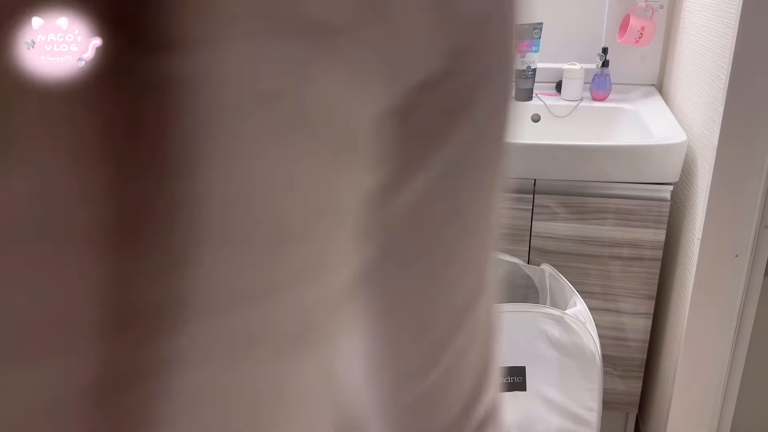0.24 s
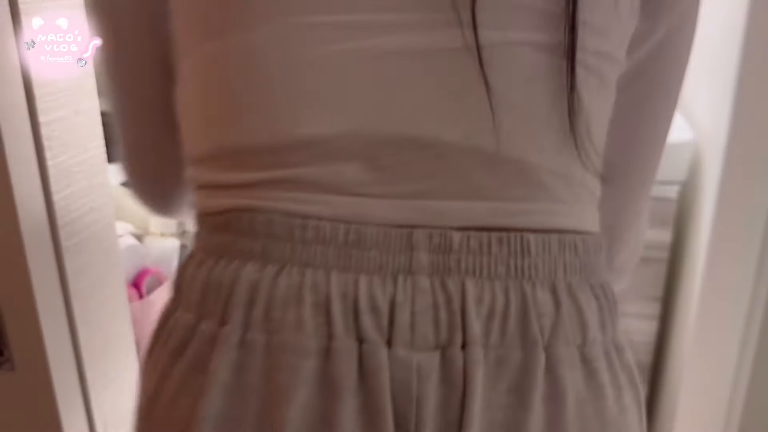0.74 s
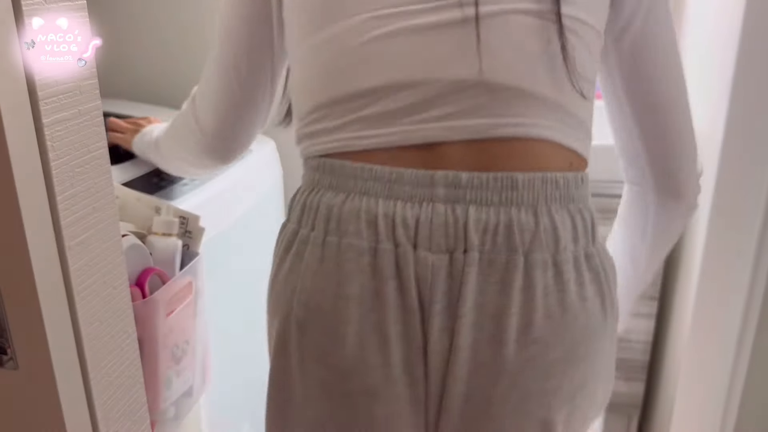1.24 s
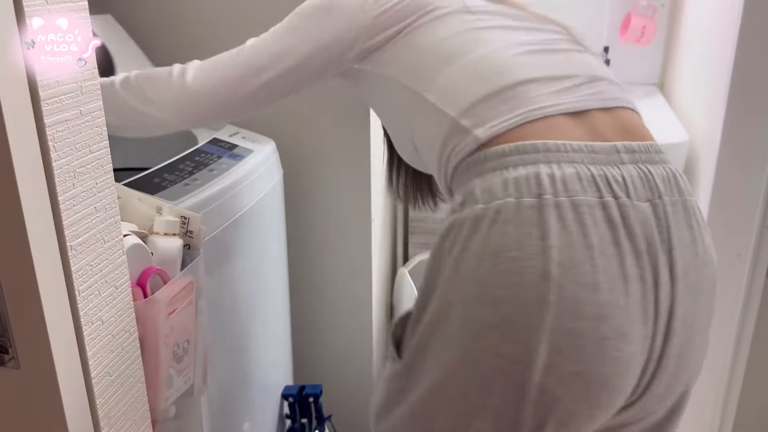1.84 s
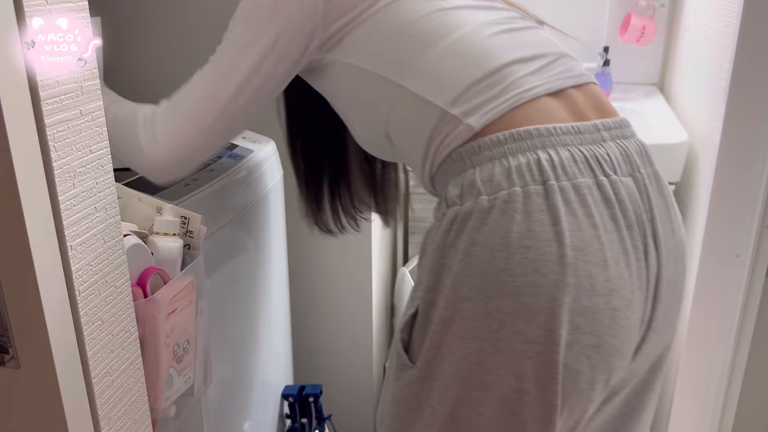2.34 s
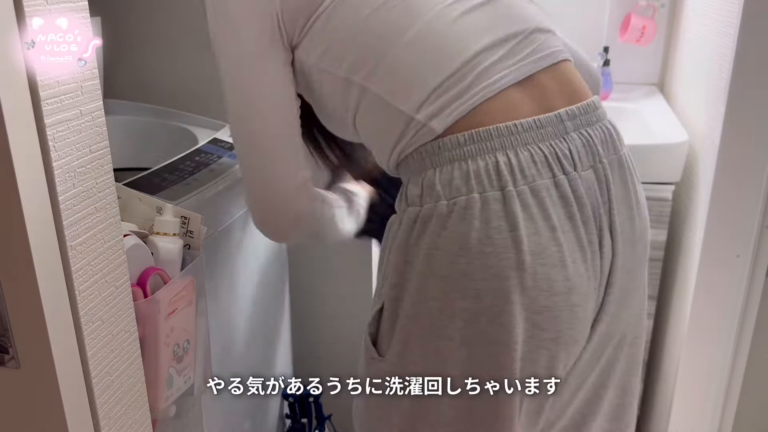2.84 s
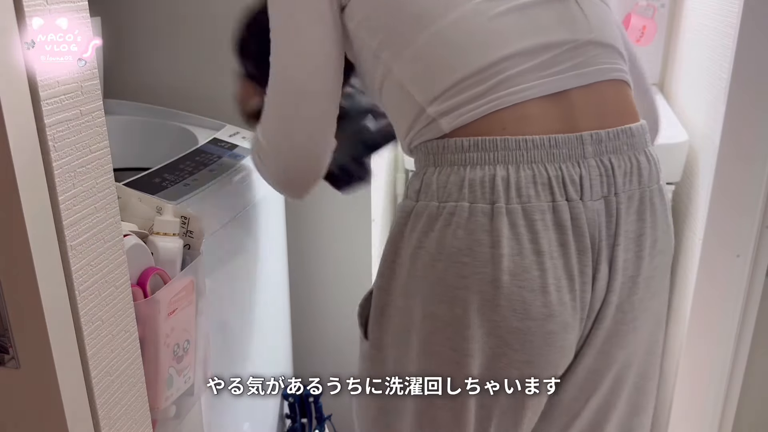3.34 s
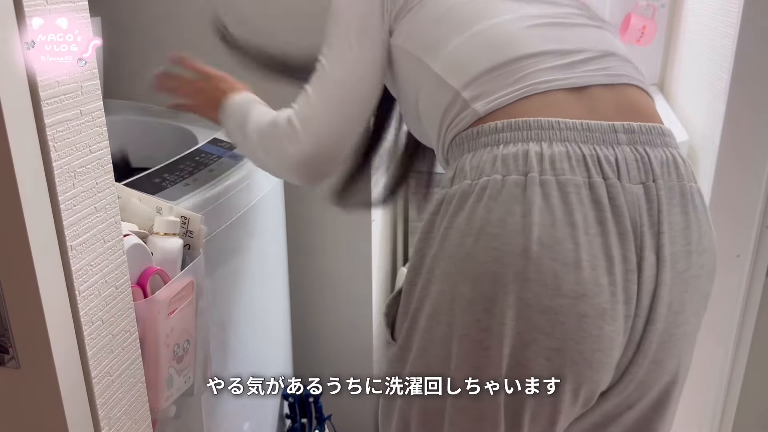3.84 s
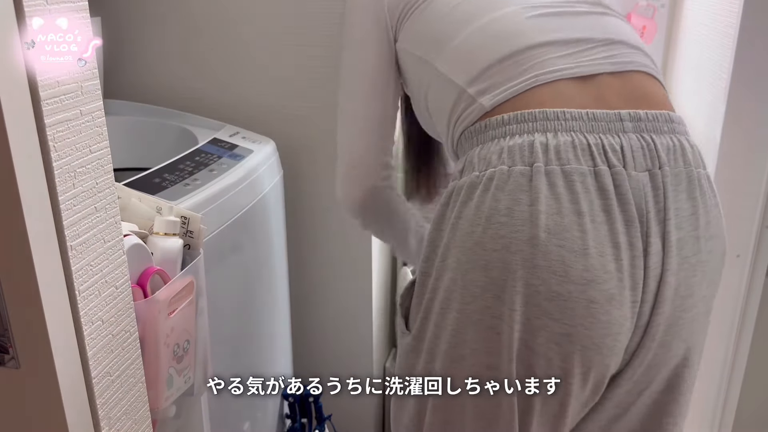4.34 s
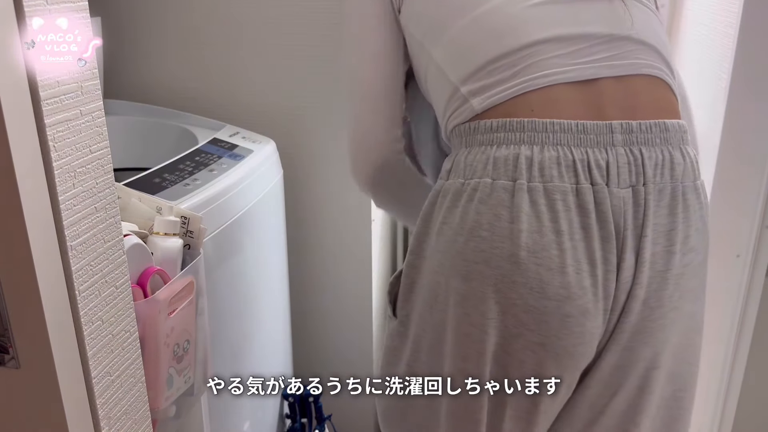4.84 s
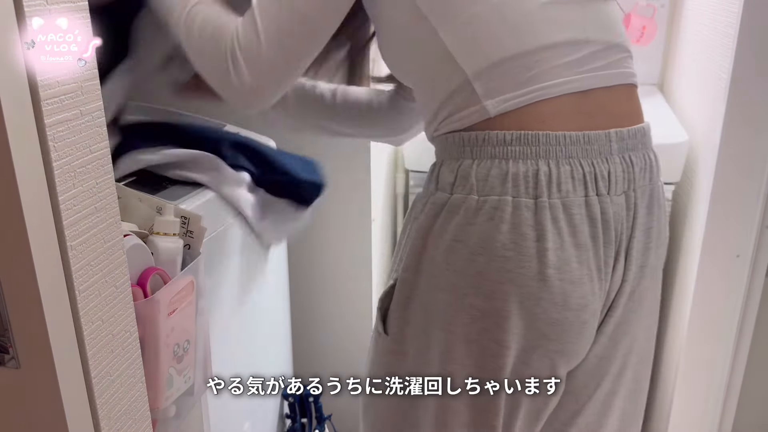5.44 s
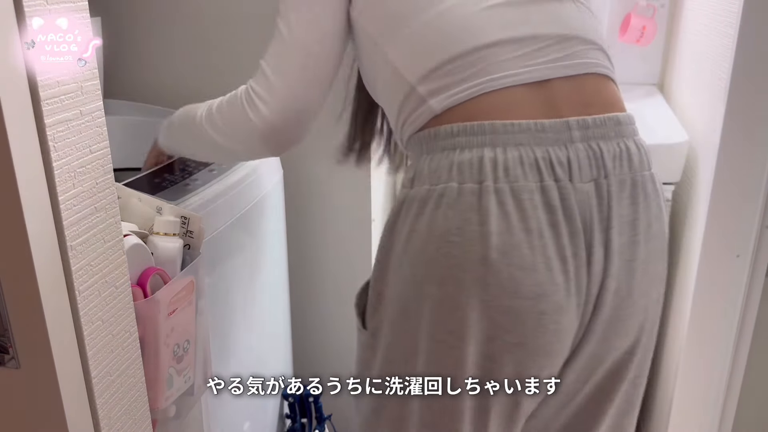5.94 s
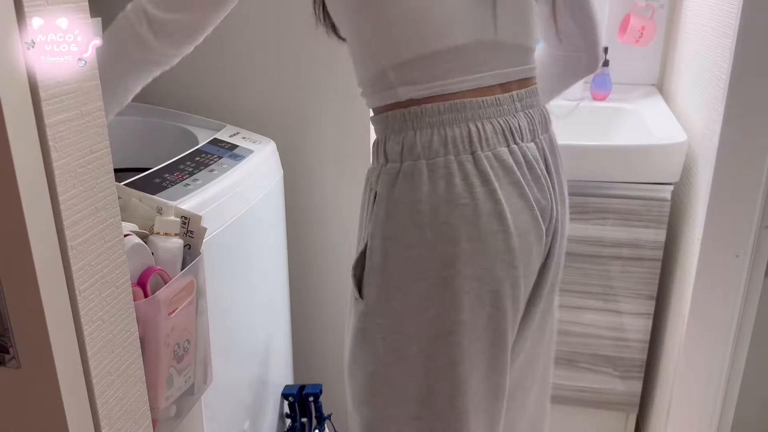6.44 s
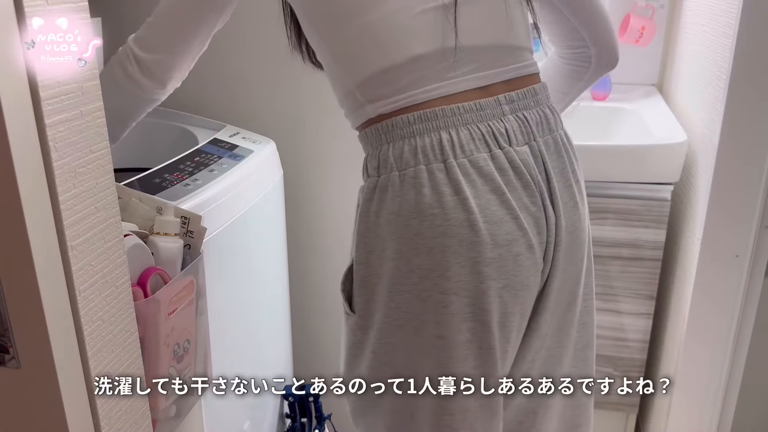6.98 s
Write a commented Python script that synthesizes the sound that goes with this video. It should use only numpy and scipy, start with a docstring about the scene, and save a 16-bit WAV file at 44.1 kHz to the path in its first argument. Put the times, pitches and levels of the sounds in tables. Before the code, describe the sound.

Close in a small, quiet washroom, a hand knocks a top-loading washer and its plastic lid clacks open. Clothes rustle and drop into the tub with soft thuds and hollow rim knocks, one sharp double click of fasteners standing out. After a lull, the motor cuts in abruptly, hums and buzzes for half a second with light rattles, then coasts to rest.

```python
"""In a small washroom, laundry goes into a top-loading washing machine: the plastic lid clacks open,
clothes swish and drop into the tub, and their fasteners click against the rim. Then the motor is heard
abruptly, humming for half a second as it turns the load with light rattles, and coasts to rest. Contacts
are shaped noise bursts with a resonance and echoes, fabric is modulated noise, and the motor is
wavering tones plus noise."""
import sys
import numpy as np
from scipy import signal
from scipy.fft import rfft, irfft, next_fast_len
from scipy.io import wavfile
from scipy.ndimage import uniform_filter1d, map_coordinates

SR = 44100
rng = np.random.default_rng(int(sys.argv[2]) if len(sys.argv) > 2 else 0)


def transcribe(signal):
    """Save signal, clipped to [-1, 1], as a 16-bit WAV file at the path in sys.argv[1]."""
    frames = np.atleast_2d(signal).T
    limited = np.clip(frames, -1, 1)
    pcm = np.round(limited * 32767).astype(np.int16)
    wavfile.write(sys.argv[1], SR, pcm)


N = 317961  # length in samples

# Room tone. Each row: frequency in Hz, relative spectral level in dB per Hz.
STILL_SPECTRUM = [(20, -17), (45, -7), (95, 3), (140, -8), (300, -20), (800, -25.5), (2000, -33.5),
                  (5000, -42), (10500, -34.5), (15000, -42.5)]
# Likeness of the two sides. Each row: frequency in Hz, left-right correlation from 0 to 1.
STEREO_LIKENESS = [(70, 0.99), (130, 1), (300, 0.88), (700, 0.21), (1800, 0.27), (5000, .58), (8000, 0.84),
                   (12000, 0.94)]
# Balance of the sides. Each row: frequency in Hz, left minus right in dB.
SIDE_BALANCE = [(100, 0.5), (300, -3), (600, 1.5), (1000, 0), (2000, 1.5), (5000, 2.2), (12000, -1)]
# Reverberation of the washroom. Each row: frequency in Hz, time to fall by 60 dB in seconds.
ROOM_DECAY = [(100, .4), (400, 0.41), (1000, 0.26), (2000, 0.24), (6000, 0.19), (14000, 0.11)]
ABSORB_HZ = 11000  # clothes and walls soak up the treble of the echoes above this
TOP_HZ = 15500  # upper band limit

# Bass noise of the tub. Each row: frequency in Hz, relative spectral level in dB per Hz.
RUMBLE_SPECTRUM = [(20, -37), (35, -21.5), (50, -2.5), (95, 2), (125, -11), (170, -6), (300, -17),
                   (600, -22), (1500, -62.5)]
# Fabric rubbing. Each row: frequency in Hz, relative spectral level in dB per Hz.
RUB_SPECTRUM = [(100, -36), (250, -1), (550, -2), (900, -1), (1700, -1.5), (3500, -13), (8000, -20.5)]
# Fabric swishing. Each row: frequency in Hz, relative spectral level in dB per Hz.
SWISH_SPECTRUM = [(1000, -21.5), (3000, -2), (6500, -2), (8300, -0.5), (11000, -3.5), (14500, -3.5),
                  (16000, -14)]
# Fabric sliding over fabric. Each row: time of the peak in seconds, length in seconds,
# relative swish level in dB, level of the rub over the swish in dB.
FABRIC_STROKES = [(0.197, 0.39, -70, -4), (0.923, 0.73, -75, 0), (1.08, 0.22, -71, 5),
                  (1.478, 0.094, -54, 7), (2.228, 0.29, -57.5, -4.5), (2.555, 0.39, -62, -4.5),
                  (2.877, 0.095, -68.5, 2.5), (4.152, 0.42, -61.5, -7.5), (4.43, .27, -53, -4.5),
                  (4.727, 0.36, -56.5, -2.5), (5.148, 0.14, -62, 5.5), (5.213, 0.077, -58, -3.5),
                  (5.532, .22, -56, -13), (5.763, 0.14, -75.5, 8.5), (7.12, 0.25, -64.5, -3.5)]
# The tub is leant on or its load shifted. Each row: time of the peak in seconds, length in seconds,
# relative rumble level in dB.
TUB_SHOVES = [(1.11, 0.14, -55), (1.48, 0.35, -47.5), (1.77, 0.15, -47.5), (2.29, 0.25, -45.5),
              (2.66, 0.19, -51), (2.92, 0.23, -56.5), (3.2, 0.64, -66), (3.47, 0.049, -61),
              (3.73, 0.18, -55.5), (3.94, 0.46, -47), (4.56, 0.44, -54), (4.87, 0.24, -53),
              (5.24, 0.19, -50.5), (5.5, 0.27, -45), (5.76, 0.28, -49.5), (5.99, 0.083, -56)]
# A movement: share of its length spent swelling, exponent shaping its top, drop in dB at its two ends.
RISE_SHARE, ROUNDNESS, EDGE_DB = 0.41, 1.6, 9

# Soft blows on the cabinet. Each row: start in seconds, relative level in dB, pitch of the push in Hz.
CABINET_BLOWS = [(0.252, -43.5, 49), (1.039, -46.5, 50), (1.328, -40.5, 75), (1.463, -37, 89),
                 (1.536, -37, 79), (2.172, -37.5, 101), (2.182, -38.5, 170), (2.277, -34, 77),
                 (3.417, -50.5, 100), (3.881, -35.5, 82.4), (3.929, -35, 265), (4.046, -36, 285),
                 (5.467, -43.5, 108), (5.692, -39.5, 83), (6.389, -32.5, 100)]
# Resonances of the cabinet's panels. Each row: frequency in Hz, width in Hz, gain in dB.
PANEL_MODES = [(51.8, 3.6, -3.5), (80.8, 9.7, 0), (101.3, 8.8, 0), (154, 9.6, 1.5), (226.6, 11, 4),
               (330, 36, -4)]
# Duller knocks of hands and clothes on the rim. Each row: start in seconds, relative level in dB,
# brightness in dB per octave, ring in Hz.
RIM_KNOCKS = [(.217, -52, 4, 1620), (1.022, -48.5, 4, 1300), (1.444, -35.5, 1.3, 645),
              (1.49, -38.5, 0.5, 2130), (1.665, -46, -2.5, 830), (1.761, -47.5, 6, 790),
              (1.984, -56, 5.5, 1990), (2.552, -45, 2.5, 2000), (2.623, -48, 0.5, 654),
              (2.857, -52.5, -2.5, 980), (3.334, -60.5, -8, 314), (3.446, -59, -10, 600),
              (3.704, -48.5, -5.5, 650), (3.925, -32.5, -10.5, 504), (4.472, -39.5, 0, 1950),
              (4.649, -51.5, 3, 1080), (4.809, -42.5, -1, 630), (5.011, -43, -3.5, 710),
              (5.283, -41, 1, 810), (5.423, -32, 1.6, 1310), (5.781, -44.5, 3.3, 1810),
              (5.898, -40.5, 0.9, 3070)]
# Hard clicks of catches and fasteners. Each row: start in seconds, relative level in dB,
# brightness in dB per octave, ring in Hz.
FASTENER_CLICKS = [(.129, -42.5, -1, 3330), (1.085, -29, -1, 4430), (1.103, -34, 1.5, 1490),
                   (1.399, -31.5, 0.5, 1630), (1.802, -44.5, 0, 2920), (2.194, -27.5, -3, 960),
                   (2.293, -36, 2.5, 7100), (2.391, -40.5, 5, 7100), (3.73, -42.5, 10.5, 650),
                   (4.027, -24, -0.7, 1100), (5.466, -12.5, 0.7, 4960), (5.553, -19.5, 1.3, 5170)]
# The lid unlatches, folds back and bounces. Each row: start in seconds, relative level in dB,
# brightness in dB per octave, ring in Hz, ring gain in dB, time for the chatter to fall by 60 dB in seconds.
LID_BLOWS = [(1.309, -26, 6, 1500, 13, 0.14), (2.156, -20.5, 1.3, 820, 5, 0.037),
             (2.253, -30.5, -0.8, 865, 7.5, 0.061), (2.33, -36.5, 0, 840, 13, 0.019)]
# Rattles of the load. Each row: start in seconds, relative level in dB.
LOAD_RATTLES = [(6.443, -54.5), (6.522, -43.5), (6.599, -52.5), (6.674, -44.5), (6.712, -42), (6.755, -40),
                (6.8, -39.5), (6.835, -39.5), (6.909, -42.5), (6.987, -45)]
# Colour of hard contacts. Each row: frequency in Hz, gain in dB.
HARD_COLOUR = [(60, -9.5), (200, -7), (750, -3.5), (1200, 1), (2500, -5.5), (3700, -5), (6500, -1),
               (9000, -0.5), (15000, -11.5)]
# Colour of soft contacts. Each row: frequency in Hz, gain in dB.
SOFT_COLOUR = [(60, 4.5), (200, 0.5), (750, 0.5), (1200, -2.5), (2500, -8), (3700, -16), (6500, -19.5),
               (9000, -25), (15000, -38)]
# Colour of loose rattling things. Each row: frequency in Hz, gain in dB.
LOOSE_COLOUR = [(60, -17), (200, -12), (750, 7.5), (1200, 0.5), (2500, 1), (3700, 0), (6500, 0.5),
                (9000, -0.5), (15000, -17.5)]
RING_OCTAVES = .33  # width of a struck part's resonance

# Magnetic hum. Each row: mean frequency in Hz, relative level in dB.
HUM_TONES = [(100, -40.5), (200, -43.5), (300, -68.5), (400, -55), (600, -48.5)]
# Tones of the running drive. Each row: mean frequency in Hz, relative level in dB.
WHIR_TONES = [(92, -43), (221, -43.5), (312, -52), (485, -59.5), (520, -73)]
# Gear noise. Each row: frequency in Hz, relative spectral level in dB per Hz.
GEAR_SPECTRUM = [(50, -27), (90, -4), (135, -23.5), (180, 1), (222, 4.5), (265, -4), (330, 0), (420, -15),
                 (520, -4), (660, -36), (1100, -27), (2500, -36.5), (6000, -53)]
# Housing buzzing under load. Each row: mean frequency in Hz, relative level in dB.
BUZZ_TONES = [(700, -82), (738, -55.5), (800, -48.5), (900, -60), (937, -77)]
# Noise of the buzz. Each row: frequency in Hz, relative spectral level in dB per Hz.
RASP_SPECTRUM = [(500, -20), (680, -2), (780, 4.5), (860, -4.5), (970, -3), (1100, -34), (1600, -28),
                 (4000, -48)]
# The drive slips as it slows. Each row: start in seconds, nominal starting pitch in Hz, relative level in dB.
DRIVE_SQUEAKS = [(6.936, 788, -57), (6.98, 1192, -51)]
HEARD_FROM_S, FADES_FROM_S = 6.389, 6.888  # the motor is heard from the first, fades after the second
# Exponential time constants in seconds:
HUM_FADE_S, COAST_S = .05, 0.084  # the hum dies quickly, the rotor coasts on
BUZZ_RISE_S, BUZZ_FALL_S = 0.0405, 0.038  # the housing buzzes only under load
TUB_RISE_S, TUB_COAST_S = 0.35, 0.12  # the heavy tub follows slowly


def amp(db):
    """Level in decibels is twenty times the logarithm of the gain, inverted here."""
    return 10 ** (np.asarray(db) / 20)


def unit(x):
    """Normalisation to a root-mean-square of 1."""
    return x / np.sqrt(np.mean(x ** 2) + 1e-20)


def along(points, hz):
    """Interpolation of (Hz, value) points over logarithmic frequency."""
    f, v = np.transpose(points)
    return np.interp(np.log(hz + 1), np.log(f), v)


def wobble(rate):
    """Slow random modulation: a smooth curve through rate random knots a second."""
    knots = rng.standard_normal(int(N * rate / SR) + 4)
    return map_coordinates(knots, [np.arange(N) * rate / SR])


def filtered(x, response):
    """Linear filtering: the spectrum is multiplied by a response of frequency."""
    n = x.shape[-1]
    padded = next_fast_len(n + SR // 4, real=True)
    hz = np.fft.rfftfreq(padded, 1 / SR)
    return irfft(rfft(x, padded) * response(hz), padded)[..., :n]


def causal(gain):
    """Minimum phase by the folded cepstrum: nothing sounds before the blow."""
    cepstrum = irfft(np.log(gain + 1e-6))
    half = len(cepstrum) // 2
    folded = np.r_[cepstrum[0], 2 * cepstrum[1:half], np.zeros(half)]
    return np.exp(rfft(folded))


def add(track, s, sound):
    """Superposition: a sound is summed into the track from time s in seconds."""
    part = track[:, max(round(s * SR), 0):][:, :sound.shape[-1]]
    part += sound[..., :part.shape[-1]]


def diffuse(size):
    """Diffuse field: white stereo noise whose left-right correlation depends on frequency."""
    def mid_side(hz):
        turn = np.arccos(np.clip(along(STEREO_LIKENESS, hz), -1, 1)) / 2
        return np.array([np.cos(turn), np.sin(turn)])

    mid, side = filtered(rng.standard_normal((2, size)), mid_side)
    return np.array([mid + side, mid - side])


def noise(spectrum, patchy_db=0):
    """Coloured stereo noise of rms 1, with patches that swell and fade at their own pitches."""
    z = signal.stft(diffuse(N), nperseg=512)[2]
    field = rng.standard_normal(z.shape[1:])
    field = uniform_filter1d(field, size=7, axis=0)
    field = uniform_filter1d(field, size=6, axis=1)
    patchy = signal.istft(z * amp(patchy_db * unit(field)), nperseg=512)[1][:, :N]
    return unit(filtered(patchy, lambda hz: amp(along(spectrum, hz))))


def room(wet_db, early_db, early_t60=0.027):
    """Reverberation: direct sound, then duller echoes off the close walls and a short decaying tail."""
    hz, t, z = signal.stft(diffuse(SR // 3), SR, nperseg=256)
    decay = amp(-60 * t / along(ROOM_DECAY, hz)[:, None])
    tail = signal.istft(z * decay, SR, nperseg=256)[1]
    size = tail.shape[1]
    early = diffuse(size) * amp(-60 * np.arange(size) / SR / early_t60)
    answer = amp(wet_db) * tail / np.linalg.norm(tail[0])
    answer += amp(early_db) * early / np.linalg.norm(early[0])
    keep = np.exp(-2 * np.pi * ABSORB_HZ / SR)
    answer = signal.lfilter([1 - keep], [1, -keep], answer)
    answer[:, 0] += 1  # direct sound
    answer[1] = np.r_[0, answer[1, :-1]]  # the machine stands a little to the left
    return answer


def still_air():
    """Stationary noise: the steady room tone under everything."""
    return amp(-67.5) * noise(STILL_SPECTRUM)


def swells(rows):
    """Power addition of overlapping movements (s, length, dB), each swelling to its peak and fading."""
    t, power = np.arange(N) / SR, np.zeros(N)
    for s, length, db in rows:
        away = np.maximum((s - t) / RISE_SHARE, (t - s) / (1 - RISE_SHARE)) / length
        near = away < 10
        power[near] += amp(db - EDGE_DB * away[near] ** ROUNDNESS) ** 2
    return np.sqrt(power)


def cloth(rumble_db=-1, rub_db=0, swish_db=1, drag_db=-20, grain_db=-3.0, fold_db=2.9, catch_db=-3):
    """Friction noise: fabric slides in folds, its threads catching finely; the load bumps and drags."""
    rumble = swells(TUB_SHOVES)
    swish = swells([(s, length, db) for s, length, db, _ in FABRIC_STROKES])
    stroke_rub = swells([(s, length, db + over) for s, length, db, over in FABRIC_STROKES])
    rub = np.hypot(stroke_rub, amp(drag_db) * rumble)
    folds = fold_db * wobble(36)
    threads = grain_db * wobble(500)
    catches = (rng.random(N) < 130 / SR) * rng.uniform(-1, 1, N)  # about 130 a second
    crackle = signal.fftconvolve(catches[None], room(-0.5, 0, early_t60=0.022), axes=1)[:, :N]
    # the rub's colour, moved up by a factor of 1.4 in frequency
    crackle = unit(filtered(crackle, lambda hz: causal(amp(along(RUB_SPECTRUM, hz / 1.4)))))
    friction = amp(threads) * noise(RUB_SPECTRUM, patchy_db=2) + amp(catch_db) * crackle
    rubbing = rub * amp(rub_db + folds) * friction
    swishing = swish * amp(swish_db + folds / 2) * noise(SWISH_SPECTRUM, patchy_db=1.1)
    return rubbing + swishing + rumble * amp(rumble_db) * noise(RUMBLE_SPECTRUM)


def thuds(gain_db=-5, cycles=1.0, direct_db=-17):
    """Forced resonance: a soft push is heard itself and sets the cabinet's panels booming."""
    out, t = np.zeros((2, N)), np.arange(SR // 2) / SR

    def panels(f):
        response = amp(direct_db)
        for centre, width, db in PANEL_MODES:
            damping = 1j * f * width
            response = response + amp(db) * damping / (centre * centre - f * f + damping)
        return response

    for s, db, push_hz in CABINET_BLOWS:
        push = np.sin(2 * np.pi * push_hz * t) * np.exp(-push_hz * t / cycles)
        boom = filtered(push, panels)
        attack = np.sqrt(np.mean(boom[:SR // 20] ** 2))
        add(out, s, amp(db + gain_db) * boom / attack)
    return out


def plastic(rows, colour, gain_db, wet_db, early_db, ring_t60, linger_db, chatter_db, rise, crack_db):
    """Impact excitation: each contact is a brief, spiky chatter, and the struck part rings on a little."""
    out, t = np.zeros((2, N)), np.arange(SR // 4) / SR
    for s, db, brightness, ring_hz, ring_db, t60 in rows:
        def near_ring(hz):
            return np.exp(-(np.log2((hz + 1) / ring_hz) / RING_OCTAVES) ** 2)

        def contact_colour(hz):
            tilt = brightness * np.log2(np.maximum(hz / 600, 1))  # above 600 Hz only
            return causal(amp(along(colour, hz) + tilt + ring_db * near_ring(hz)))

        spikes = chatter_db * rng.standard_normal(len(t))
        chatter = rng.standard_normal(len(t)) * amp(spikes - 60 * t / t60)
        ring = filtered(rng.standard_normal(len(t)), near_ring) * amp(linger_db - 60 * t / ring_t60)
        blow = (chatter / np.linalg.norm(chatter) + ring) * (1 - np.exp(-t / rise))
        blow[:3] += amp(crack_db) * np.array([.5, -1, .5])  # first touch, the brightest instant
        heard = signal.fftconvolve(blow[None], room(wet_db, early_db), axes=1)[:, :SR // 3]
        heard = filtered(heard, contact_colour)
        attack = np.sqrt(np.mean(heard[:, :SR // 50] ** 2))  # rms of the first 20 ms
        add(out, s, amp(db + gain_db) * heard / attack)
    return out


def knocks(ring_db=4.0, t60=0.057):
    """Soft impact: padded blows bring out the rim's hollow notes."""
    rows = [(*knock, ring_db, t60) for knock in RIM_KNOCKS]
    return plastic(rows, SOFT_COLOUR, gain_db=-9.5, wet_db=3.0, early_db=2.5, ring_t60=.16,
                   linger_db=-38.5, chatter_db=8.5, rise=.0014, crack_db=-4)


def clicks(ring_db=4, t60=0.029):
    """Hard impact: small hard parts strike the plastic in short bursts."""
    rows = [(*click, ring_db, t60) for click in FASTENER_CLICKS]
    return plastic(rows, HARD_COLOUR, gain_db=-11.5, wet_db=1.5, early_db=-1, ring_t60=0.13,
                   linger_db=-32.5, chatter_db=4, rise=0.00092, crack_db=-5)


def lid():
    """Panel resonance: the lid's panels clack and ring."""
    return plastic(LID_BLOWS, SOFT_COLOUR, gain_db=-10.0, wet_db=5.0, early_db=6.5, ring_t60=0.13,
                   linger_db=-42, chatter_db=2.0, rise=0.0005, crack_db=-12)


def rattles(ring_hz=2300, ring_db=5, t60=0.076):
    """Repeated impact: loose things chatter in the turning tub."""
    rows = [(s, db, 0, ring_hz, ring_db, t60) for s, db in LOAD_RATTLES]
    return plastic(rows, LOOSE_COLOUR, gain_db=-9.5, wet_db=6.5, early_db=6.5, ring_t60=.068,
                   linger_db=-56, chatter_db=5, rise=0.00035, crack_db=-0.5)


def squeak(rise_hz=330, length=.028, rough=.06):
    """Frictional slip: each slip of the slowing drive is a short, rising, rough harmonic squeak."""
    out, t = np.zeros((2, N)), np.arange(SR // 4) / SR
    for s, start_hz, db in DRIVE_SQUEAKS:
        glide = start_hz + rise_hz * (1 - np.exp(-t / length))
        pitch = glide * (1 + rough * wobble(845)[:len(t)])
        phase = 2 * np.pi * np.cumsum(pitch) / SR
        chirp = sum(np.sin(k * phase) / k for k in (1, 2, 3))
        chirp *= np.exp(-(t / length) ** 2) * (1 - np.exp(-t / 0.00058))
        add(out, s, amp(db) * signal.fftconvolve(chirp[None], room(-0.5, -0.5), axes=1))
    return out


def dry_tick(db=-33, fall=0.0013):
    """Transient: a one-sided pulse decays exponentially, a dry tick where the motor is first heard."""
    out, t = np.zeros((2, N)), np.arange(SR // 100) / SR
    add(out, HEARD_FROM_S, -amp(db) * np.exp(-t / fall))
    return out


def rise_and_fade(rise_s, fall_s):
    """Exponential envelope, 0 to 1: rises from HEARD_FROM_S and decays after FADES_FROM_S."""
    t = np.arange(N) / SR
    rise = 1 - np.exp(-np.maximum(t - HEARD_FROM_S, 0) / rise_s)
    return rise * np.exp(-np.maximum(t - FADES_FROM_S, 0) / fall_s)


def tones(lines, waver_db, drift_hz):
    """Standing waves of the room bring each wavering tone to the two sides at different phases."""
    out, t = np.zeros((2, N)), np.arange(N) / SR
    for hz, db in lines:
        apart = np.arccos(np.clip(along(STEREO_LIKENESS, hz), -1, 1)) / 2
        drift = drift_hz * np.cumsum(wobble(20)) / SR
        phase = rng.uniform(0, 2 * np.pi) + 2 * np.pi * (hz * t + drift)
        out += amp(db + waver_db * wobble(6.1)) * np.sin(phase + apart * np.array([[1], [-1]]))
    return np.sqrt(2) * out


def motor(hum_db=-1, whir_db=0, growl_db=-43, buzz_db=-3, rasp_db=-49, lumps_db=2, tub_db=-43,
          abrupt_s=0.0014, strain_db=1.5):
    """Magnetic force hums at multiples of twice the mains rate; rotor and gears shake the housing."""
    humming, running = rise_and_fade(abrupt_s, HUM_FADE_S), rise_and_fade(abrupt_s, COAST_S)
    load, turning = rise_and_fade(BUZZ_RISE_S, BUZZ_FALL_S), rise_and_fade(TUB_RISE_S, TUB_COAST_S)
    strain = strain_db * wobble(14)  # the shifting load makes the motor labour unevenly
    hum = amp(hum_db + strain) * tones(HUM_TONES, waver_db=0.5, drift_hz=0.51)
    whir = amp(whir_db) * tones(WHIR_TONES, waver_db=-2, drift_hz=2.01)
    gears = amp(growl_db + lumps_db * wobble(40)) * noise(GEAR_SPECTRUM, patchy_db=3)
    buzz = amp(buzz_db + strain) * tones(BUZZ_TONES, waver_db=1.0, drift_hz=0.9)
    rasp = amp(rasp_db) * noise(RASP_SPECTRUM)
    tub = amp(tub_db) * noise(RUMBLE_SPECTRUM)
    return humming * hum + running * (whir + gears) + load * (buzz + rasp) + turning * tub


def scene():
    """Superposition of all sources in the washroom, whose walls favour either side by frequency."""
    loading = cloth() + thuds() + knocks() + clicks() + lid()
    machine = rattles() + squeak() + dry_tick() + motor()
    sound = still_air() + loading + machine
    return filtered(sound, lambda hz: amp(along(SIDE_BALANCE, hz) * np.array([[.5], [-.5]])))


def record(dry, low_cut_hz=40):
    """Band limiting: the microphone loses the lowest bass, and a steep slope ends the treble."""
    def band(hz):
        low_cut = hz ** 2 / np.sqrt(hz ** 4 + low_cut_hz ** 4)
        return low_cut / np.sqrt(1 + (hz / TOP_HZ) ** 120)

    return filtered(dry, band)


dry = scene()
out = record(dry)
transcribe(out)
```